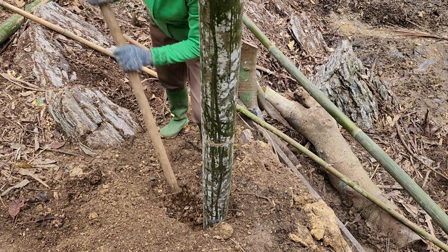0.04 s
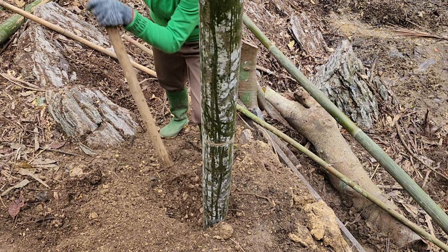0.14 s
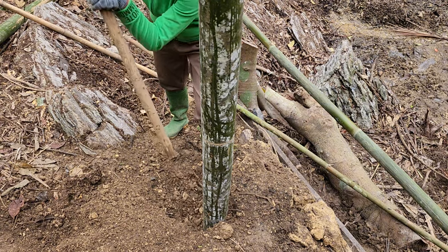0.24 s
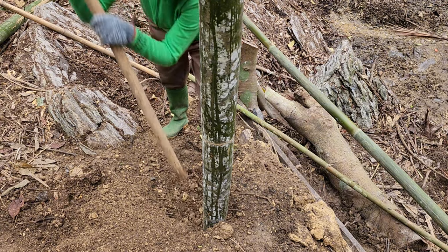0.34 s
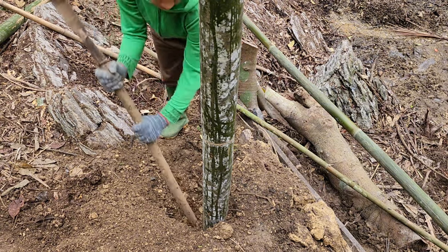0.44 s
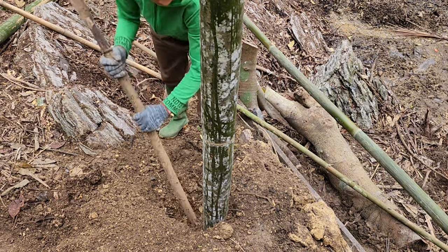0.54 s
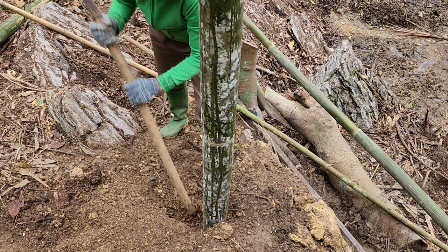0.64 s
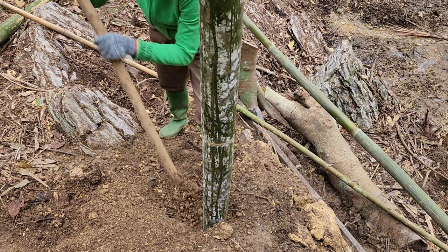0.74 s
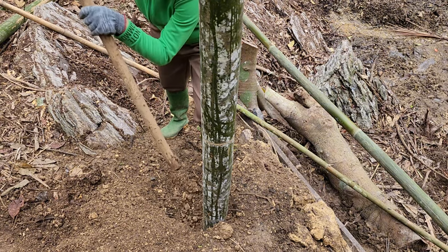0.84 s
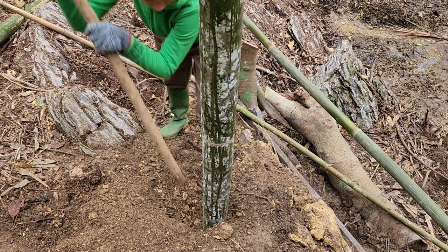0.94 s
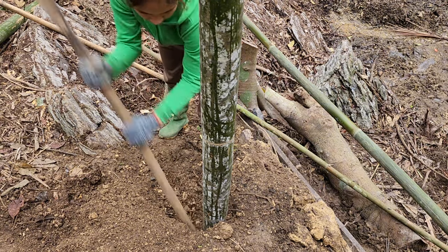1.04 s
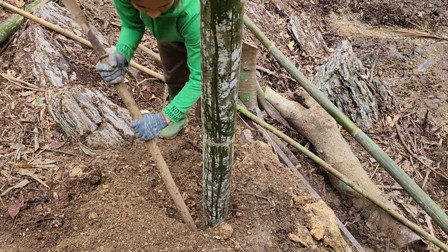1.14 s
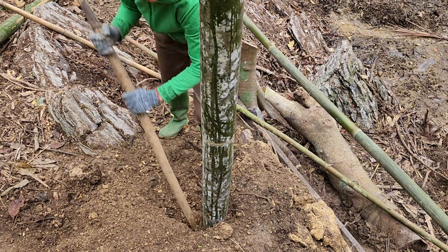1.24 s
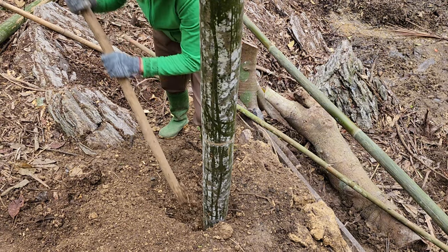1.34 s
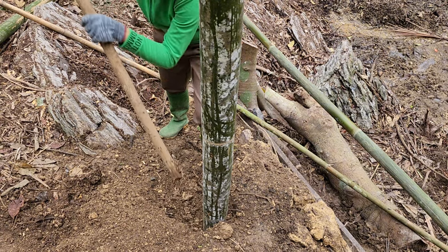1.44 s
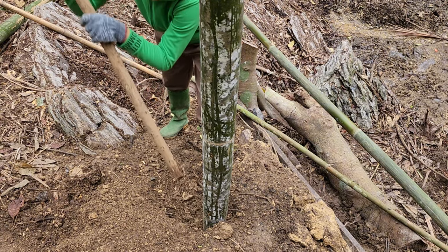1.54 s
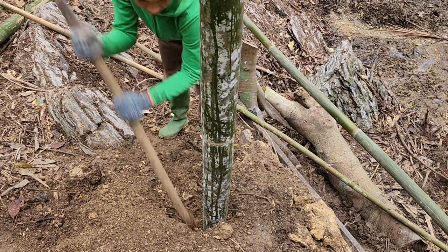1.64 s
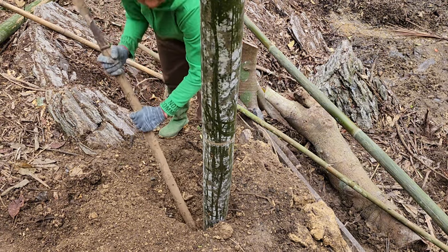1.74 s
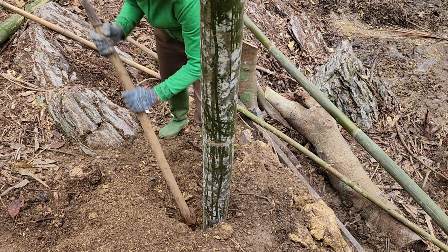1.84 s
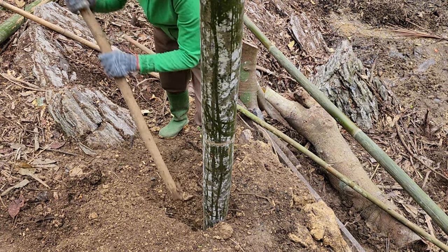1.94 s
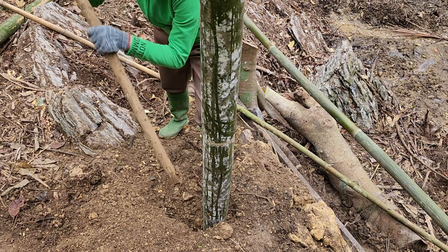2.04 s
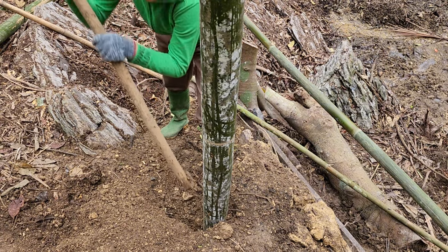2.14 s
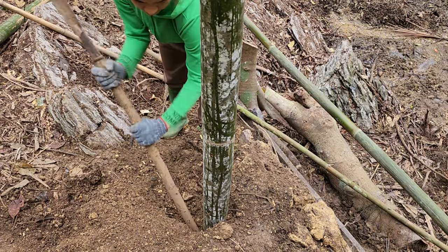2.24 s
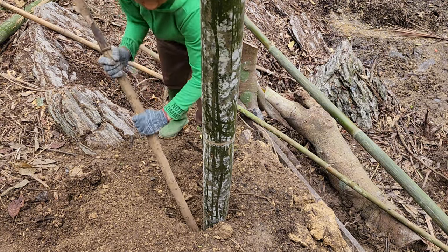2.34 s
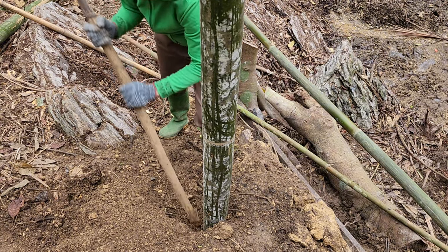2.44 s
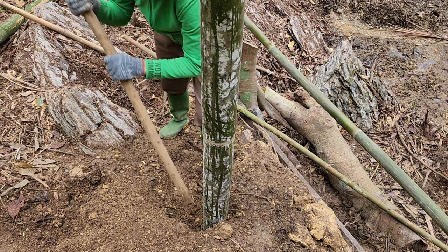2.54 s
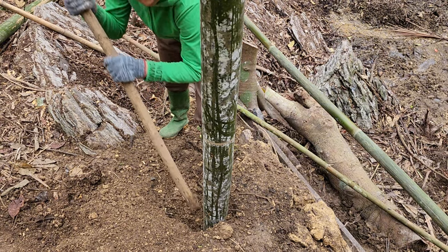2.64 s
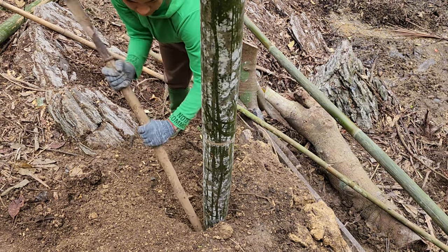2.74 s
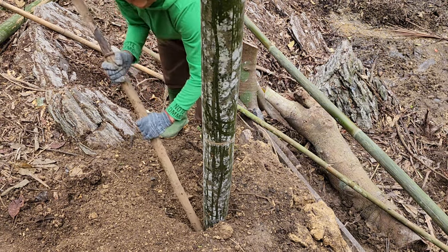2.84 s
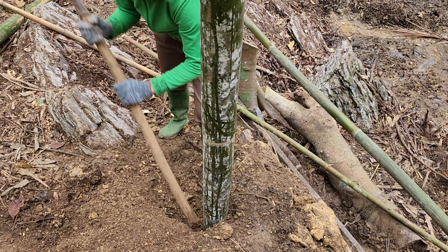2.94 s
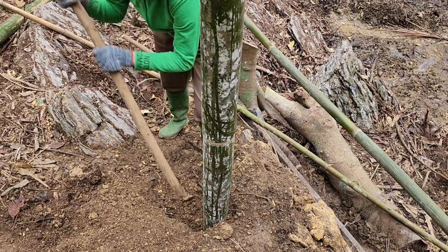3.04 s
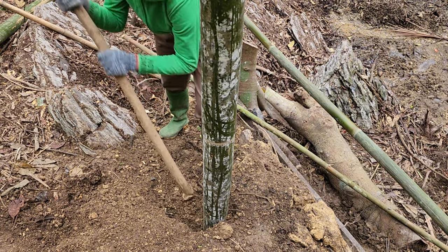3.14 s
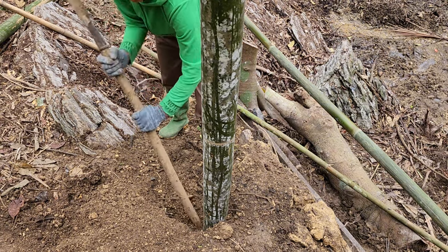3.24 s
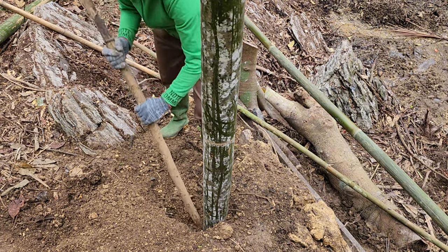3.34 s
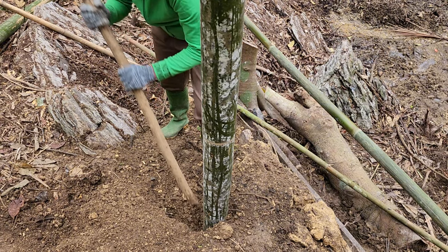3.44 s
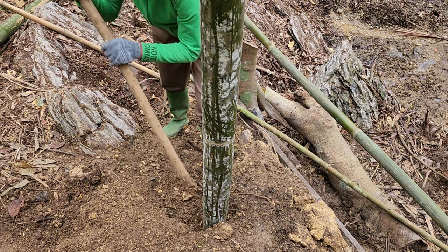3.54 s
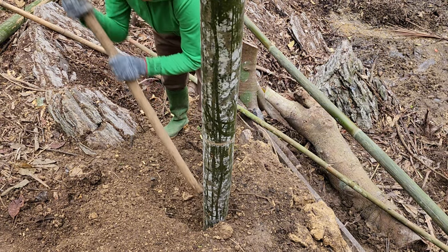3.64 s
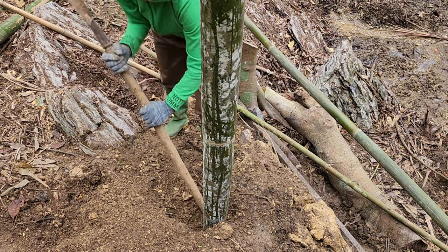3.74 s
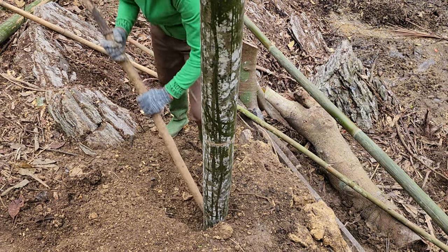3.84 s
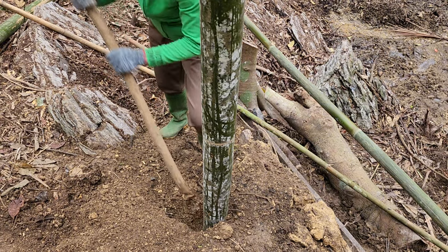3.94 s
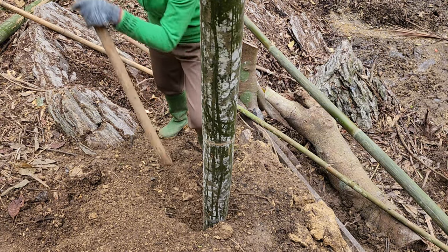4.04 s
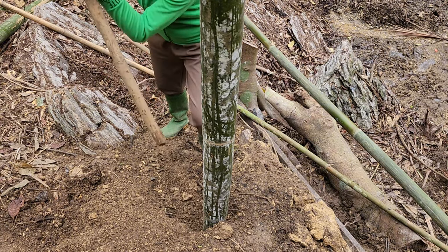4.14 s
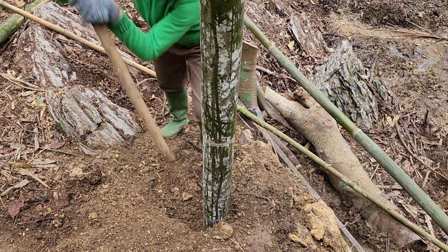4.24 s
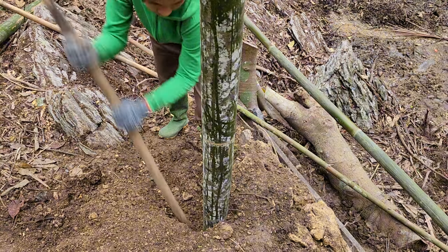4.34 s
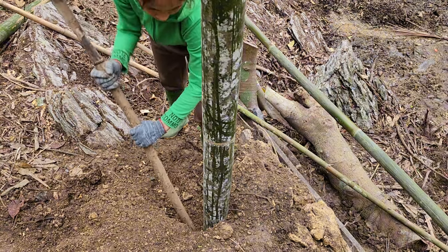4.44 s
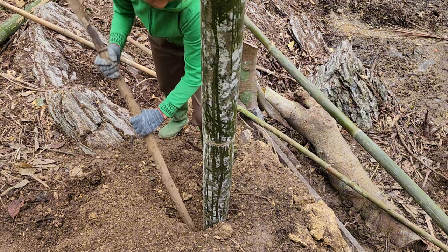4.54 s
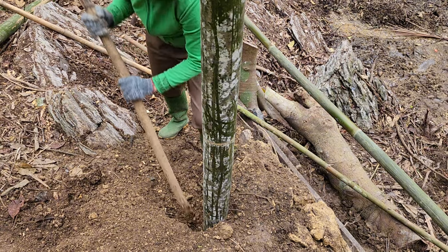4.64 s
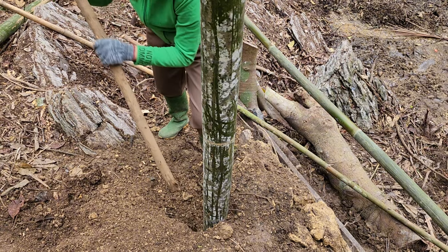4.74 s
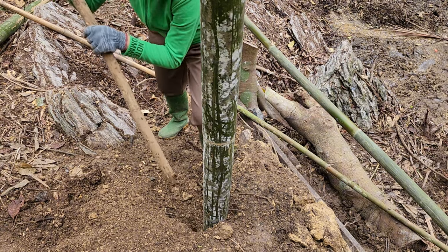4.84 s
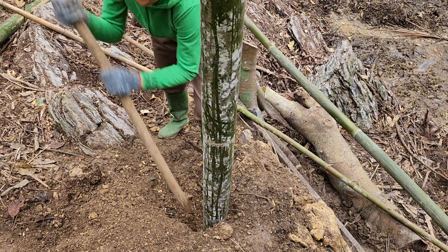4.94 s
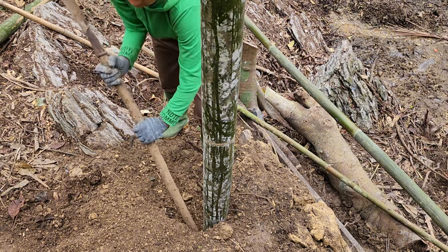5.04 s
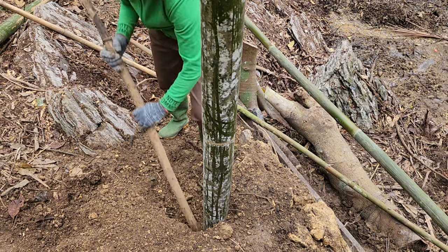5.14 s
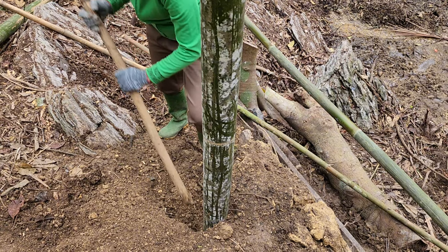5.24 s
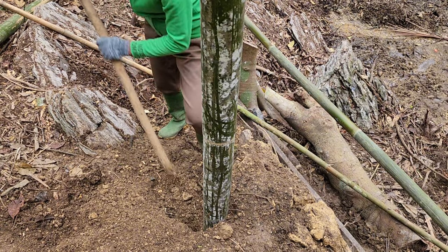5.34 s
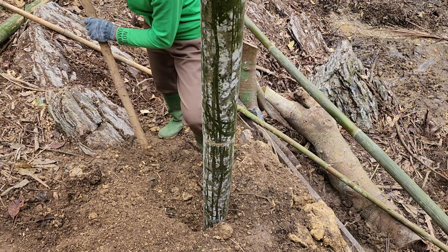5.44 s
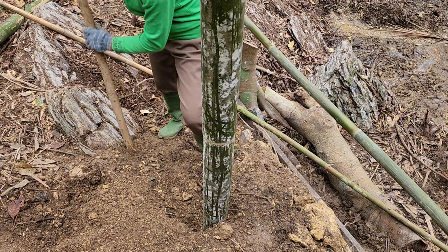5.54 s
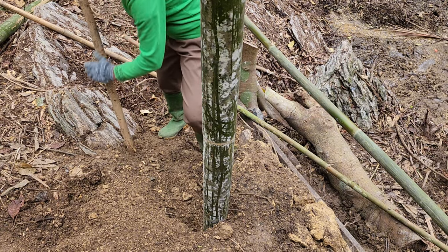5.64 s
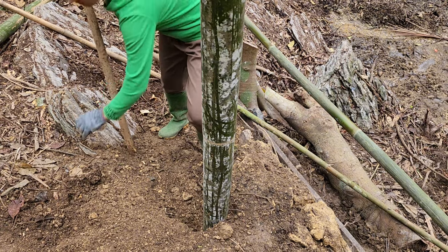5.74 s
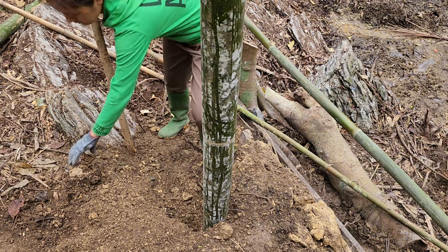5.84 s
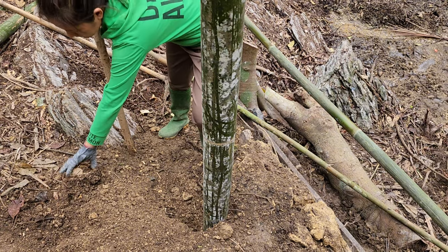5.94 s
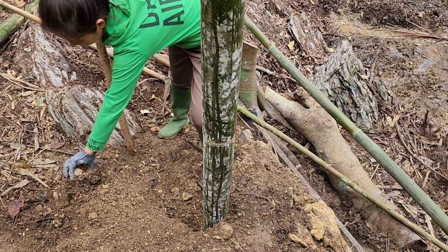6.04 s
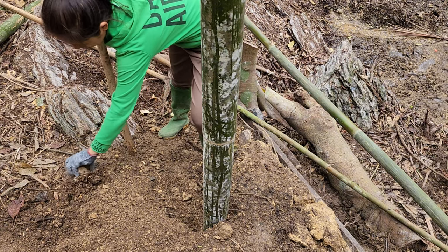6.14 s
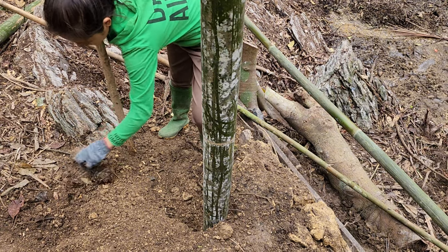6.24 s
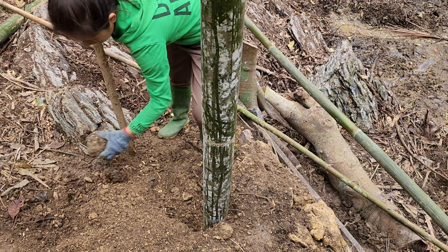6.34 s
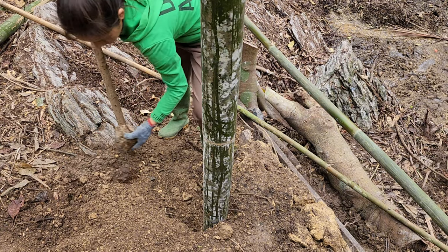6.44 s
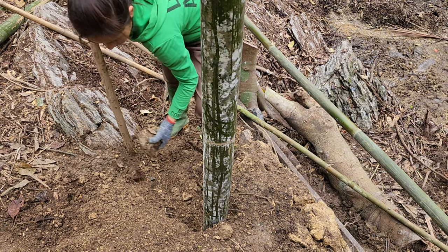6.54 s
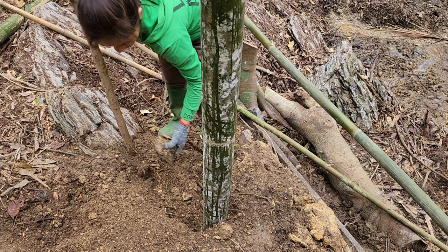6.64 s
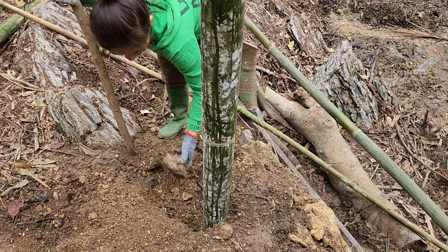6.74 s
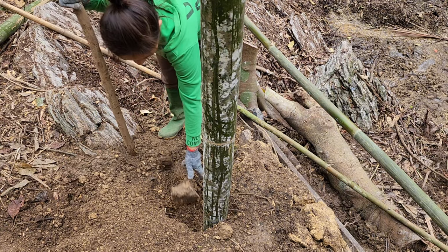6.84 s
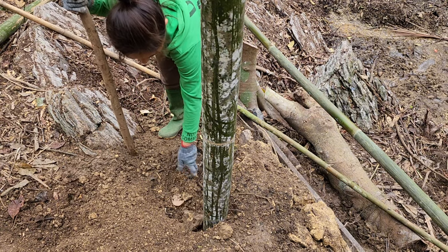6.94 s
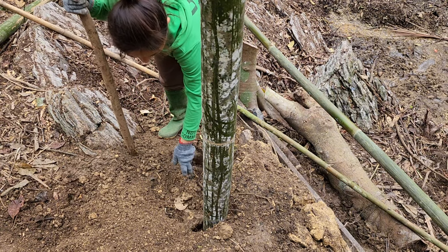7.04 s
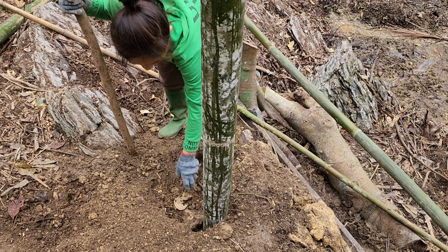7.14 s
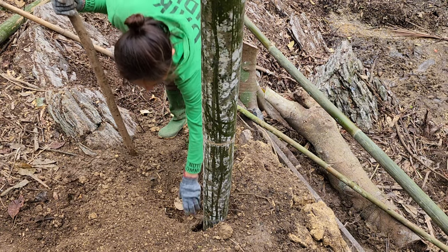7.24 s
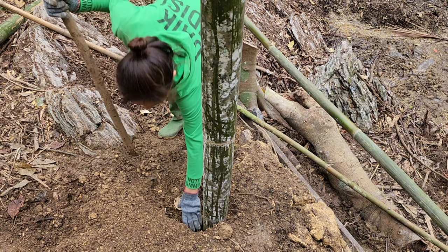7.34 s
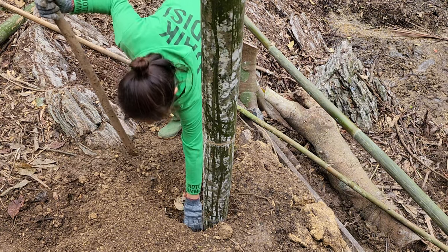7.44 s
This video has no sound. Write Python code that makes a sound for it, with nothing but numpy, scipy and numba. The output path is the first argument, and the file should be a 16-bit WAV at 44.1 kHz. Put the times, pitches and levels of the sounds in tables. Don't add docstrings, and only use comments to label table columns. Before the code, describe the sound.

Close to the microphone, a wooden pole is rammed into loose soil beside a bamboo post. About every half second comes a gritty crunch, stony crack, brief hollow wood ring and dull ground thump, followed by trickling crumbs. After nine blows there is a softer knock, faint movement, then one last woody hit. Insects chirr steadily over quiet forest hiss.

```python
import sys
import numpy as np
from scipy import signal
from scipy.fft import rfft, irfft
from scipy.io import wavfile
from scipy.ndimage import uniform_filter1d, map_coordinates
from numba import njit

SR = 44100
rng = np.random.default_rng(int(sys.argv[2]) if len(sys.argv) > 2 else 0)


def ratio(d):
    e = np.asarray(d, float) / 20
    return 10 ** e


def waveform_to_disk(signal):
    frames = np.transpose(np.atleast_2d(signal))
    scaled = np.clip(frames, -1, 1) * 32767
    samples = np.round(scaled).astype(np.int16)
    wavfile.write(sys.argv[1], SR, samples)


N = 330750

# [tip bites t/s, ploughing/s, grit level/dB, grit tilt/(dB/octave), wood level/dB]
BLOWS = [(.445, 0.0062, -15, 3.5, -0.5), (1.049, 0.021, -13, -0.5, -1.5), (1.671, 0.013, -11.5, 1, -1.5),
         (2.243, 0.021, -11.5, -4.5, -1), (2.741, 0.021, -16.5, -1.5, -4), (3.209, 0.031, -18.5, -10.5, 0),
         (3.704, 0.029, -21, -0.5, -2.5), (4.371, 0.013, -12, 2, -2), (5.004, 0.015, -14, 3, 0),
         (5.55, .015, -42.5, 12, 7.5), (6.925, 0.011, -16, -7, 8)]
# [f/Hz, density/dB]
SAND = [(2650, -54.5), (4500, 9.5), (4690, -4), (5630, 2), (5970, -7), (7550, -13), (8780, -23),
        (11500, -2.5), (15700, -23.5)]
# [f/Hz, density/dB]
DUST = [(4410, -42), (7500, -3), (8560, -5), (9050, -39), (10500, 0.5), (11700, 11.5), (15700, -15.5)]


def level(x, db):
    return x * ratio(db) / np.sqrt(np.mean(x ** 2))


def colour(x, table, share=1):
    hz = np.maximum(np.fft.rfftfreq(N, 1 / SR), 1)
    points = np.array(table)
    gain_db = np.interp(np.log(hz), np.log(points[:, 0]), points[:, 1])
    return irfft(rfft(x) * ratio(share * gain_db), N)


@njit
def svf(x, hz, width):
    y, b, l = np.empty(len(x)), 0., 0.
    for i in range(len(x)):
        g, k = np.tan(np.pi * hz[i] / SR), width[i] / hz[i]
        v = (b + g * (x[i] - l)) / (1 + g * (g + k))
        b, l, y[i] = 2 * v - b, l + 2 * g * v, k * v
    return y


@njit
def follow(x, attack, release):
    y, e = np.empty(len(x)), 0.
    for i in range(len(x)):
        e += (x[i] - e) * (attack if x[i] > e else release)
        y[i] = e
    return y


def band(x, hz, width_hz):
    return svf(x, np.full(len(x), 1. * hz), np.full(len(x), 1. * width_hz))


def band_twice(x, hz, width_hz):
    return band(band(x, hz, width_hz), hz, width_hz)


def mode(x, hz, t60):
    pole = np.exp(2j * np.pi * hz / SR - np.log(1000) / (t60 * SR))
    return signal.lfilter([1], [1, -pole], x).imag


def walk(rate_hz):
    k = int(SR / rate_hz)
    steps = np.repeat(rng.standard_normal(N // k + 1), k)
    return level(uniform_filter1d(uniform_filter1d(steps, k), k)[:N], 0)


def grains(rate_hz, spread_db):
    hit = rng.random(N) < rate_hz / SR
    return hit * rng.standard_normal(N) * ratio(spread_db * rng.exponential(size=N))


def add(track, s, sound):
    i = int(s * SR)
    track[i:i + len(sound)] += sound[:N - i]


def forest():
    # [f/Hz, density/dB]
    spectrum = [(15, -24), (25, 5.5), (134, -3), (234, -15), (264, -7), (418, -4.5), (496, -9.5), (787, -4),
                (1410, 0.5), (2990, -5), (4860, -12), (5490, -4.5), (7530, -19), (8300, -57),
                (10800, -67.5), (18300, -120)]
    # [f/Hz, left minus right/dB]
    balance = [(60, -2.5), (110, 0.5), (200, 14), (380, 5.5), (700, 7), (1290, 4), (2380, -3), (4400, -1.5),
               (8120, -6.5), (15000, -7)]
    swell = walk(.8)
    mid, side = (colour(rng.standard_normal(N), spectrum) for _ in range(2))
    hz = np.maximum(np.fft.rfftfreq(N, 1 / SR), 20)
    mid, side = rfft(mid), rfft(side) * np.clip(hz / 500, .55, 1)
    both = np.array([mid + side, mid - side])
    out = 0
    for octave in range(10):
        share = np.clip(1 - abs(np.log2(hz / 30) - octave), 0, 1)
        drift_db = .8 * swell + (.8 + 2 * (octave < 3)) * walk(6)
        out = out + ratio(drift_db) * irfft(share * both, N)
    out = [colour(out[0], balance, .5), colour(out[1], balance, -.5)]
    return level(np.array(out), -50)


def song(resonances, rate_hz, pan_db):
    sides = []
    for side in (1, -1):
        clicks = grains(rate_hz, 1.5)
        rung = sum(ratio(db) * level(band_twice(clicks, hz, w), 0) for hz, w, db in resonances)
        sides.append(level(rung, side * pan_db / 2))
    return np.array(sides)


def insects():
    # [f/Hz, width/Hz, level/dB]
    throbber = [(5340, 110, 1), (5540, 180, 1)]
    # [t/s, throbs so far]
    throb_count = [(-.12, -1), (1.23, 4), (2.77, 10), (4.87, 18), (6.51, 24), (7.57, 28)]
    # [t/s, level/dB]
    throb_db = [(0, 1.5), (1.5, 3.5), (2.4, -3.5), (3.7, -0.5), (5.2, 0), (6.4, 2.5), (7.5, -7)]
    # [t/s, level/dB]
    chirr_db = [(0, -58), (1, -58), (1.8, -58.5), (2.2, -59), (3.2, -64.5), (4.5, -55), (5.2, -75),
                (5.9, -76), (7.1, -82), (7.5, -69.5)]
    t = np.arange(N) / SR
    off_beat = (np.interp(t, *np.transpose(throb_count)) + .5) % 1 - .5
    pulse = np.exp(-(off_beat / 0.32) ** 2)
    throb = ratio(-18) + ratio(np.interp(t, *np.transpose(throb_db))) * pulse
    low_gain = ratio(np.interp(t, *np.transpose(chirr_db)) + 1.5 * walk(6.7))
    low = low_gain * song([(6130, 270, 0)], 4400, -6.0)
    high = ratio(-65.5 - 2.5 * walk(1.6)) * song([(6510, 480, 0)], 4400, -8.0)
    return ratio(-58.5) * throb * song(throbber, 4300, -10) + low + high


def sleeves_and_dust():
    # [t/s, length/s, level/dB]
    rubs = [(0.187, .03, -68.5), (4.576, 0.014, -62.5), (5.15, 0.037, -69), (5.623, 0.034, -58),
            (6.184, .015, -60.5), (7.033, .015, -69)]
    tail_db, tail_s = -43, 0.027
    t = np.arange(N) / SR
    swish = sum(ratio(db) * np.exp(-((t - s) / length) ** 2) for s, length, db in rubs)
    patter = 0
    for s, plough_s, db, *_ in BLOWS:
        patter = patter + ratio(db + tail_db) * (t > s) * np.exp(-abs(t - s - plough_s) / tail_s)
    return (swish + patter) * level(colour(grains(9000, 1.2), DUST), 0)


def wood(force):
    # [f/Hz, level/dB, t60/s]
    modes = [(161.4, -12, 0.16), (198, -11, 0.033), (289, 2, 0.058), (411, -0.5, 0.044), (621, -17, 0.052),
             (661, 2, 0.025), (705, -11, 0.051), (817, -21.5, 0.033)]
    return sum(ratio(db) * mode(force, hz, t60) for hz, db, t60 in modes)


def dull(x):
    return signal.sosfilt(signal.butter(4, 4200, fs=SR, output="sos"), x)


def crunch(tilt_db, rate_hz, spread_db):
    octaves = np.arange(8) / 4 - .5
    rarity_db = 6 * (octaves[:, None] - .3) ** 2
    shares = ratio(np.outer(octaves, tilt_db) - rarity_db)
    sizes = []
    for hz in 1650 * 2 ** octaves:
        sizes.append(level(band_twice(grains(rate_hz / 5, spread_db), hz, hz / 4), 0))
    return dull(np.sum(shares * sizes, axis=0) / np.linalg.norm(shares[:4], axis=0))


def soil(tables, fine, rate_hz, spread_db):
    t = np.arange(N) / SR
    rows = np.concatenate(tables)
    grit_db, tilt_db, clod_db, sand_db, wood_db = (np.interp(t, rows[:, 0], rows[:, k]) for k in range(1, 6))
    moving = sum((t > c[0][0]) & (t < c[-1][0]) for c in tables)
    gate = uniform_filter1d(moving * 1., 200)
    force = grains(rate_hz, spread_db)
    grit = crunch(tilt_db, rate_hz, spread_db)
    clods = level(band_twice(grains(rate_hz / 2, spread_db), 850, 700), 0)
    sand = level(colour(force, fine), 0)
    push = uniform_filter1d(grains(rate_hz, 0.44), size=30)
    ring = wood(push * gate * ratio(grit_db + wood_db)) / np.std(wood(push))
    grinding = grit + ratio(clod_db) * clods + ratio(sand_db) * sand
    return gate * ratio(grit_db) * grinding + ratio(0.5) * ring


def slide(start, peak, db, tilt_db, wood_db):
    clods_db, dust_db = -5, -25.5
    steps = ((start, -7.5), (peak, 0), (peak + .045, -16.5))
    return np.array([(s, db + step_db, tilt_db, clods_db, dust_db, wood_db) for s, step_db in steps])


def slides():
    # [start t/s, peak t/s, grit level/dB, grit tilt/(dB/octave), wood level/dB]
    trickles = [(.12, .2, -56, 0, -5), (0.525, 0.588, -48, 2.5, -18), (1.143, 1.208, -45.5, 4.5, -9.5),
                (1.245, 1.27, -51.5, -9, 0.5), (1.73, 1.769, -49.5, 6.5, -16), (2.34, 2.381, -49, 0, -6),
                (2.827, 2.874, -42, -3.5, -1.5), (3.3, 3.346, -48.5, -6, 4),
                (3.78, 3.837, -47.5, -1.5, -13), (4.441, 4.582, -48.5, 5, -15),
                (5.086, 5.16, -51.5, 6, -21), (5.95, 6.207, -57.5, 5.5, -2.5), (7.003, 7.009, -64, -1, 12)]
    return soil([slide(*row) for row in trickles], DUST, 13000, 0.99)


def squeaks():
    # [t/s, length/s, f/Hz, level/dB]
    slips = [(0.445, 0.016, 3270, -22), (1.031, 0.0065, 2500, -38), (1.04, .006, 3500, -30),
             (1.07, 0.0074, 840, -14.5), (1.091, 0.014, 914, -28.5), (1.252, 0.02, 720, -44),
             (1.422, 0.0082, 660, -42), (1.423, 0.012, 1340, -38), (2.735, 0.015, 3460, -27.5),
             (2.869, .012, 1330, -36.5), (3.219, 0.01, 1315, -14), (3.699, .005, 2400, -43),
             (6.928, .007, 1260, -14.5)]
    out = np.zeros(N)
    t = (np.arange(3000) - 1500) / SR
    for s, length, hz, db in slips:
        tone = level(band_twice(rng.standard_normal(3000), hz, hz / 5), db)
        add(out, s + t[0], np.exp(-(t / length) ** 2) * tone)
    return out


def shakes():
    # [t/s, level/dB, f/Hz, length/s]
    wobbles = [(0.455, -18, 62.7, 0.065), (1.078, -21, 61.7, 0.077), (1.693, -27, 54.8, 0.091),
               (2.267, -23, 50.2, 0.083), (2.764, -29, 50, 0.045), (3.229, -35.5, 40, .1),
               (3.733, -24.5, 58.4, 0.048), (4.396, -27, 51.5, 0.098), (5.035, -24, 47.5, 0.1),
               (5.554, -37.5, 50, 0.055), (5.787, -41.5, 55.4, .04), (6.055, -56.5, 61, 0.094),
               (6.933, -23.5, 55.8, 0.058), (7.208, -47.5, 50, 0.02), (7.464, -53.5, 54.8, .05)]
    out = np.zeros(N)
    t = np.arange(SR // 2) / SR
    for s, db, hz, length in wobbles:
        rough = level(band_twice(rng.standard_normal(len(t)), hz, 45), -5)
        swell = (1 - np.exp(-t / 0.004)) * np.exp(-(t / length) ** 2)
        add(out, s, ratio(db) * swell * (np.sin(2 * np.pi * hz * t) + rough))
    return out


def thumps():
    # [t/s, peak/dB, f/Hz, t60/s]
    stops = [(0.443, -3, 95, 0.048), (1.06, -1.5, 86, 0.046), (1.681, -1.5, 125, 0.048),
             (2.258, -17.5, 91.5, 0.15), (2.753, -29, 140, 0.14), (3.226, -39, 146, 0.07),
             (3.728, -25, 120, 0.12), (4.37, -4, 107.4, 0.089), (5.019, -13.5, 102, 0.14),
             (5.547, -20.5, 112.7, 0.098), (5.788, -40, 84, 0.056), (6.067, -47, 87, 0.055),
             (6.932, -13.5, 170.4, 0.14), (7.079, -44.5, 97, 0.079), (7.469, -46.5, 87.5, 0.063)]
    out = np.zeros(N)
    t = np.arange(SR // 2) / SR
    for s, db, hz, t60 in stops:
        turns = hz * t + 0.2 * hz * 0.014 * (1 - np.exp(-t / 0.045))
        decay = (1 - np.exp(-t / .004)) * 1000 ** (-t / t60)
        add(out, s, -ratio(db + 5) * decay * np.sin(2 * np.pi * turns))
    return out


def cracks():
    # [t/s, peak/dB, centre f/Hz, treble level/dB, wood level/dB]
    contacts = [(.447, -5.5, 820, -29, -38), (1.045, -3, 1300, -20, -12.5), (1.416, -17, 1318, -41, -14.5),
                (1.674, -4.5, 1610, -25.5, -10.5), (2.241, 4, 724, -37.5, -15.5),
                (2.254, 2.5, 1350, -30.5, -11.5), (2.742, -3, 2230, -19, -33.5),
                (3.225, 4, 763, -29, -10.5), (3.461, -27, 1890, -12, -23),
                (3.703, -9.5, 2240, -13.5, -32.5), (3.725, -7, 717, -25, -14),
                (4.368, -5.5, 2655, -28, -26), (4.609, -28.5, 680, -34, -8), (5.015, -2.5, 1110, -26, -16),
                (5.5598, -8, 226, -47, -17), (6.933, -3, 700, -19.5, -1)]
    out, spit, knock = np.zeros((3, N))
    t = np.arange(900) / SR
    for s, db, hz, treble_db, wood_db in contacts:
        noise = rng.standard_normal(900)
        add(out, s + 0.001006, ratio(db - 1.5) * np.exp(-t / 0.0018) * np.cos(2 * np.pi * hz * t))
        add(out, s, ratio(db - 4) * np.exp(-t / .005) * band(noise, hz, hz))
        add(spit, s, ratio(db + treble_db) * np.exp(-t / .0015) * noise)
        add(knock, s, ratio(db + wood_db - 8) * np.hanning(48) / 24)
    sand_gain = np.std(colour(rng.standard_normal(N), SAND))
    return dull(out) + colour(spit, SAND) / sand_gain + wood(knock)


def blow(s, plough_s, db, tilt_db, wood_db, clods_db, sand_db):
    late = np.array([-1, -1, 0, 1, 1])
    early, after = (-late).clip(0), late.clip(0)
    return np.transpose([s + np.cumsum([-0.023, 0.023, plough_s, 0.019, 0.036]),
                         db + np.array([-41.5, -8.5, 0, -20.5, -44]),
                         tilt_db + 1 * early + 2 * after,
                         clods_db + 6 * after,
                         sand_db - 3.5 * late,
                         wood_db + 6 * late])


def blows():
    # [clods level/dB, fine sand level/dB]
    ground = [(-4, -7), (-4.5, -14), (-10, -11), (-6, -18), (-7, -16), (-10, -20.5), (-9.5, -9.5),
              (-8, -11.5), (-3.5, -7), (5.5, -2.5), (-15, -21)]
    return soil([blow(*row, *met) for row, met in zip(BLOWS, ground)], SAND, 12000, 1.5)


def ports(near):
    # [f/Hz, left minus right/dB]
    balance = [(60, 0.5), (110, 0.0), (200, 0.5), (380, 0.5), (700, -0.5), (1290, -3.0), (2380, -7.5),
               (4400, -4.0), (8120, -3.5), (15000, -3.5)]
    lag_s, scatter_db = .00013, -1
    late = map_coordinates(near, [np.arange(N) - lag_s * SR], order=3)
    treble = signal.sosfilt(signal.butter(1, 1800, "high", fs=SR, output="sos"), near)
    left, right = (x + ratio(scatter_db) * walk(300) * treble for x in (near, late))
    return np.array([colour(left, balance, .5), colour(right, balance, -.5)])


def scene():
    near = sleeves_and_dust() + slides() + squeaks() + shakes() + thumps() + cracks() + blows()
    return forest() + insects() + ports(near)


def low_pass(x):
    return signal.sosfilt(signal.butter(12, 15830, fs=SR, output="sos"), x)


def record(dry):
    # [f/Hz, density/dB]
    hiss = [(7000, -33.5), (8800, -13.5), (10500, -8), (11800, -2), (15800, -1.5)]
    dry = dry + [level(colour(rng.standard_normal(N), hiss), -72) for _ in range(2)]
    attack_s, release_s = 0.1, .12
    loudness = follow(np.abs(dry).mean(axis=0), 1 / (attack_s * SR), 1 / (release_s * SR))
    ducked = dry * (1 + loudness / ratio(-23.0)) ** -.35
    rounded = np.tanh(ducked / 1.15) * 1.15
    mix = signal.sosfilt(signal.ellip(8, .2, 60, 15800, fs=SR, output="sos"), rounded)
    return low_pass(mix)


dry = scene()
out = record(dry)
waveform_to_disk(out)
```